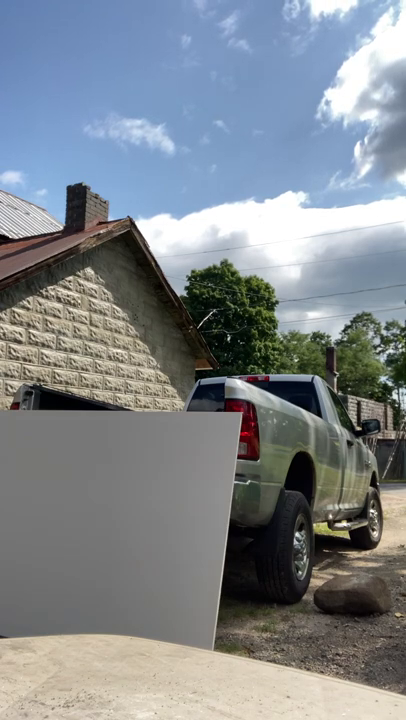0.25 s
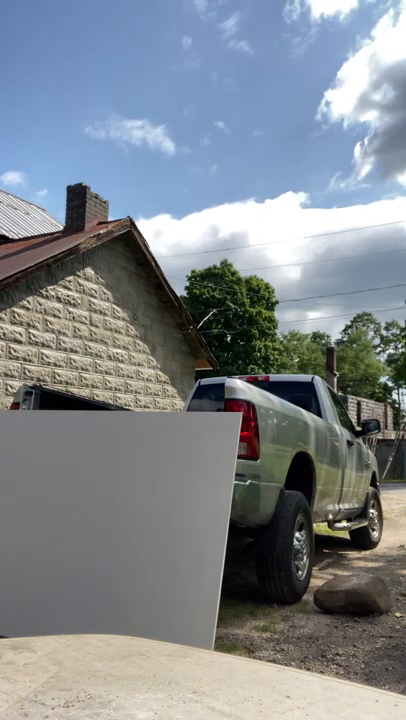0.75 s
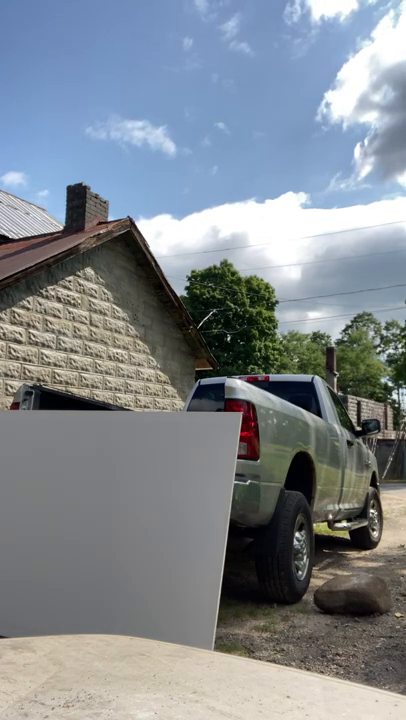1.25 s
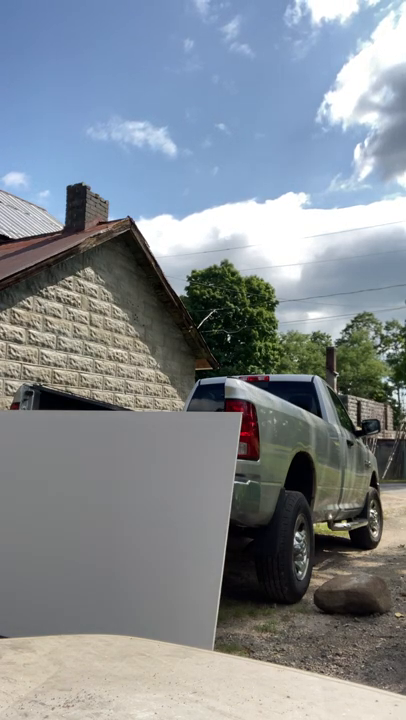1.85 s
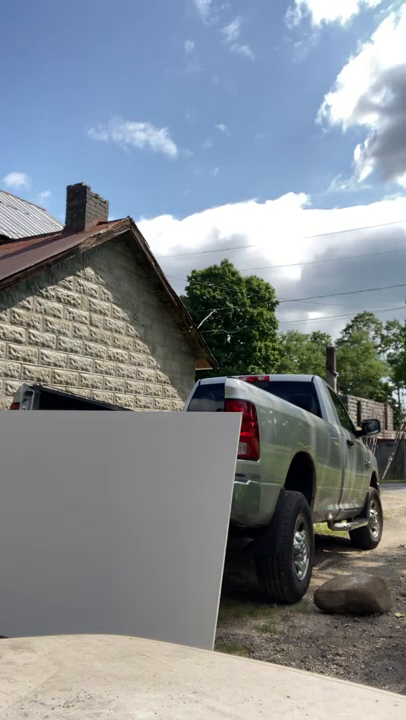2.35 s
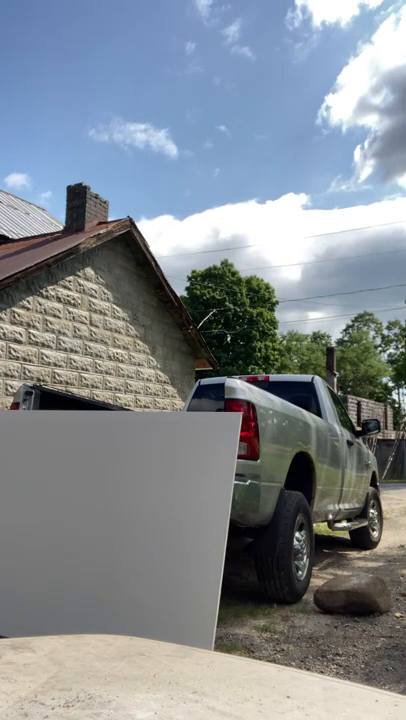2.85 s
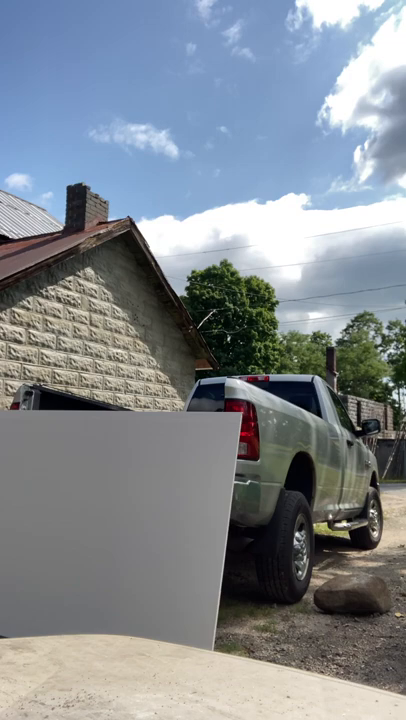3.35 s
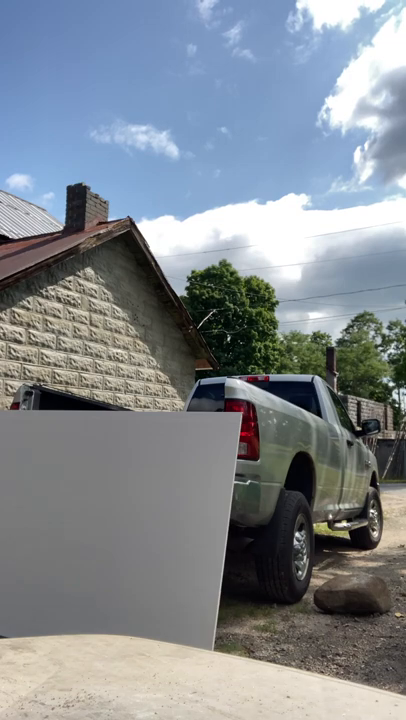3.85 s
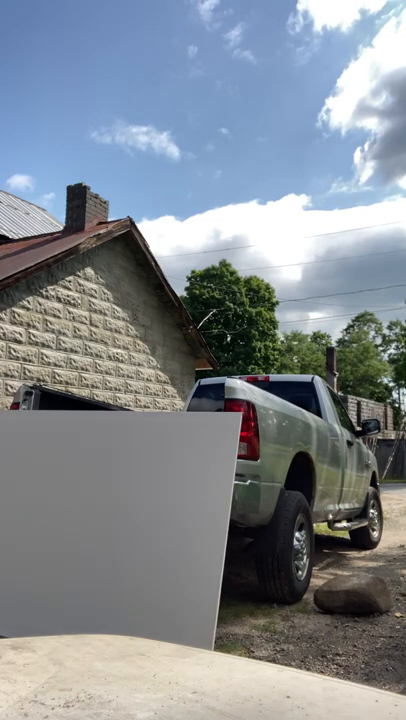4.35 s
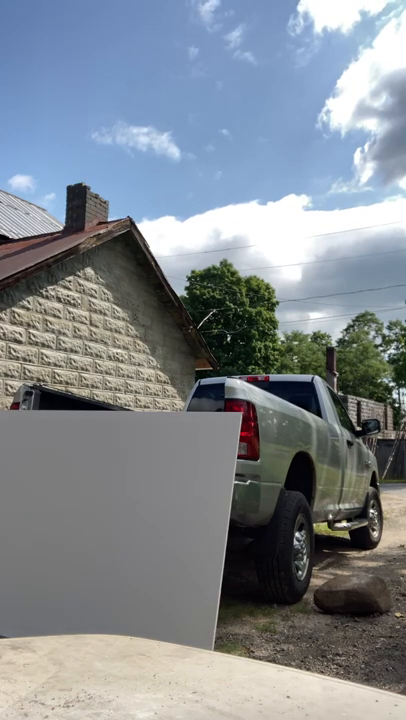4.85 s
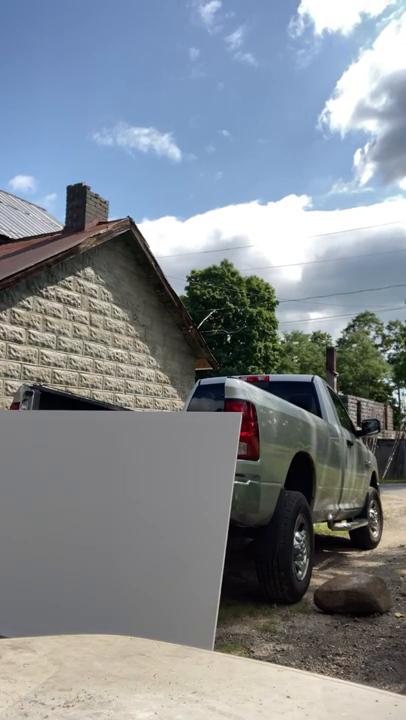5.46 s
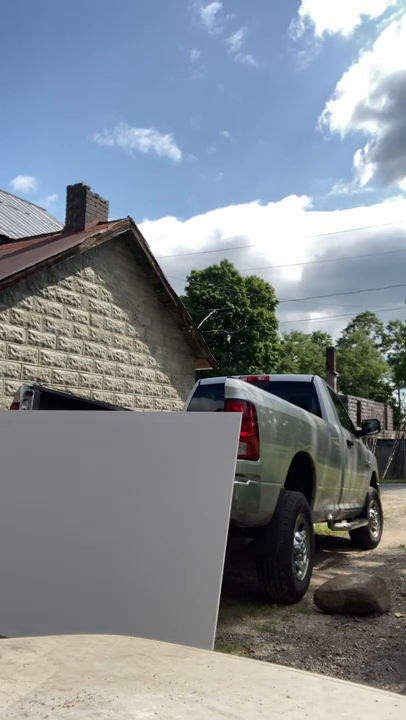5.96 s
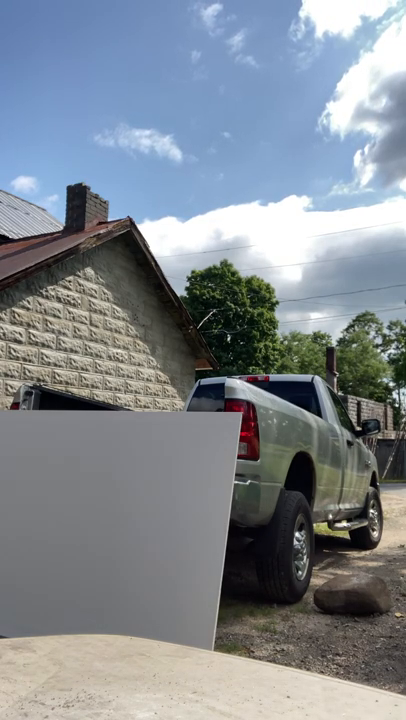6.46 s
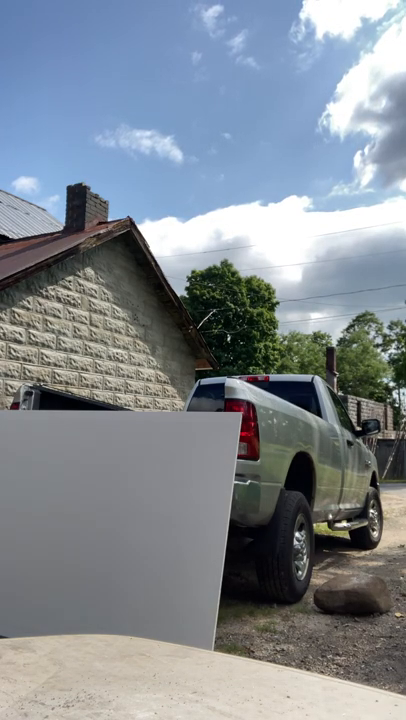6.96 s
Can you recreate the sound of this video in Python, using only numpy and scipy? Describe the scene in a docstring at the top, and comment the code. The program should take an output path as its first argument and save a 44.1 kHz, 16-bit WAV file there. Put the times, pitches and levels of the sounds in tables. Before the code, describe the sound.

Faint insects and distant traffic wash open over a soft low drone. The truck's hum pulses stronger and glides down a little, gaining an uneven growl, wall reflection and road roar in the second half. Brief air hisses puff a few times, and hollow truck-bed knocks tumble midway. Open yard beside a stone building, recorded by two closely spaced microphones with slight wind rumble.

```python
"""A six-cylinder truck engine drones closer beside a yard as it slows: gliding orders of its firing rate.
With it come a wall echo at a shifted rate, tread hums (tones) and road roar (shaped noise).
Leaves and wind are swelling noise; insects are throbbing bands and a cricket's pulsed note.
Air puffs are noise bursts with a whistle; load thuds are decaying modes of the truck bed.
Two microphone ports close together hear it all with differing phase and level."""
import sys
import numpy as np
from scipy import signal
from scipy.io import wavfile
from scipy.ndimage import uniform_filter1d

SR = 44100
rng = np.random.default_rng(int(sys.argv[2]) if len(sys.argv) > 2 else 0)


def to_wav(s):
    """Save 16-bit WAV."""
    ch = np.atleast_2d(s).T  # columns
    pcm = np.round(np.clip(ch, -1, 1) * 32767)  # PCM
    wavfile.write(sys.argv[1], SR, pcm.astype(np.int16))


N = 317520
T = np.arange(N) / SR  # time/s

# Spectra below are relative densities; noise() scales each to rms 1 before its level is applied.

# Firing rate while the truck slows: t/s, direct f/Hz, rise off a wall f/Hz, block f/Hz before its wobble
FIRING_RATE = [(0, 125.5, 0, 124.3), (1.44, 124.4, 0.5, 123.1), (2.4, 119.7, 0, 119.1),
               (3.36, 115.9, 0.5, 116.6), (4.08, 113.7, 1.37, 112.2), (4.8, 111.9, 3, 111.4),
               (5.4, 110.1, 2.5, 110.6), (5.85, 109.2, 3, 110.6), (6.35, 108.9, 3.5, 110.1),
               (6.65, 108.7, 8.5, 109.1), (7.2, 108.9, 5, 110.5)]
# Firing tone swelling and sinking: t/s, level/dB
FIRING_LEVEL = [(0, -59), (.13, -62), (.2, -47.5), (.33, -60), (.65, -45), (.97, -48.5), (1.13, -43),
                (1.5, -40), (1.7, -48), (1.95, -40.5), (2.4, -47), (2.54, -40.5), (2.63, -42.5),
                (2.71, -36.5), (2.82, -41.5), (2.93, -33.5), (3.03, -41), (3.13, -56), (3.24, -34.5),
                (3.28, -42), (3.32, -36), (3.355, -45), (3.38, -34.5), (3.44, -43), (3.52, -36.5),
                (3.62, -48), (3.78, -37), (3.84, -42.5), (4.14, -49.5), (4.4, -37), (4.56, -54), (4.8, -50),
                (4.95, -40), (5.01, -40), (5.07, -39.5), (5.2, -42), (5.29, -44.5), (5.35, -32),
                (5.57, -41), (5.76, -29.5), (6.03, -31.5), (6.2, -33.5), (6.5, -37), (6.96, -34),
                (7.2, -68)]
# Wall echo, before its fade-in: t/s, firing tone level/dB, 3/2 order level/dB
WALL_ECHO = [(3.6, -73, -69), (4.2, -53, -46.5), (4.5, -40.5, -53.5), (4.8, -55.5, -46.5), (5.4, -44, -47),
             (5.65, -65, -41.5), (5.95, -45.5, -68), (6.25, -34, -70), (6.6, -50, -55), (6.9, -44.5, -49),
             (7.2, -35.5, -52)]
# Weak exhaust orders, before their waver: t/s, 3/2 order level/dB, level/dB of each weak multiple
WEAK_ORDERS = [(0, -64, -62, -69), (.8, -80, -69.5, -62.5), (1.3, -70, -60.5, -66.5), (1.9, -74, -60, -65),
               (2.75, -49.5, -63.5, -66), (3.1, -53.5, -59.5, -66), (3.6, -50.5, -65, -68),
               (4.1, -55, -62, -60), (4.4, -64, -79, -63.5), (5.1, -74, -59, -53), (5.9, -56, -72, -62),
               (6.4, -49, -74, -55), (7.2, -67, -72, -55)]
# Weak multiples of the engine cycle (six to the firing rate)
WEAK_CYCLES = [12, 17]
# Growl of the engine block, before offsets, throb and fade-in: t/s, level/dB
GROWL_LEVEL = [(3, -72), (3.2, -64), (3.9, -60), (4.1, -56), (4.4, -52), (4.7, -57.5), (5, -49),
               (5.3, -50.5), (5.55, -51), (5.8, -53.5), (6, -44), (6.17, -49), (6.33, -45), (6.42, -49.5),
               (6.55, -38), (6.7, -45.5), (6.82, -48.5), (6.92, -42), (7.05, -42.5), (7.2, -38.5)]
# Growl multiples of the engine cycle
GROWL_CYCLES = [10, 11, 13, 18, 33]
# Offset of each growl multiple: level/dB
GROWL_OFFSETS = [-18, -13, -23, 0, -32]
# Rasp above the growl, before offsets, throb and fade-in: t/s, level/dB
RASP_LEVEL = [(3.6, -82), (4.3, -60.5), (5, -57.5), (5.7, -61.5), (7.2, -59.5)]
# Rasp multiples of the engine cycle
RASP_CYCLES = [21, 23, 24]
# Offset of each rasp multiple: level/dB
RASP_OFFSETS = [-18, -0.5, -1]
# Block order at 5/2 the firing rate, before throb and fade-in: t/s, level/dB
HALF_ORDER = [(3.5, -65), (4.6, -63.5), (5.3, -57), (5.8, -72), (6.25, -46.5), (6.5, -65), (6.7, -54),
              (6.9, -62), (7.2, -67)]
WAVER_DB, WAVER_HZ = 4, 8  # rms waver of weak orders and tread hums, and its fastest rate
THROB_DB, THROB_HZ = 1.2, 9  # rms throb of the block orders, and its fastest rate
WOBBLE_TURNS, WOBBLE_HZ = .005, 6  # rms phase wobble of the block before smoothing, and its fastest rate
IN_STEP_S = 6.31  # direct sound and echo are in step here

# Tread hums: multiple of the rate off the wall, left-right level/dB, left port lag t/s
TREADS = [(1.218, 1, 0.00041), (.91, -1, 0.00027)]
# Tread hums before their waver: t/s, level/dB of each
TREAD_LEVELS = [(0, -61, -53.5), (.8, -60.5, -77), (1.4, -53, -77), (2.4, -56.5, -59), (3.4, -54, -49),
                (4.4, -52, -47), (5.4, -58.5, -51.5), (6.4, -47.5, -61), (7.2, -57, -61)]
# Road rumble spectrum: f/Hz, density level/dB per Hz
RUMBLE_SPECTRUM = [(40, -33), (70, -0.5), (110, 9.5), (170, 6.5), (240, -6), (320, -13), (900, -92)]
# Deeper rumble of the bumpy stretch: f/Hz, density level/dB per Hz
BUMPY_SPECTRUM = [(40, -30), (70, -8), (100, 3), (135, 8), (200, -9), (400, -43), (900, -90)]
# Road roar spectrum: f/Hz, density level/dB per Hz
ROAR_SPECTRUM = [(150, -20.5), (250, -1.5), (330, 0.5), (420, 0.5), (500, -2), (600, -4.5), (800, -15.5),
                 (3000, -70)]
# Road roar: t/s, level/dB
ROAR_LEVEL = [(0, -63), (1.6, -59), (3.4, -58), (4.2, -55), (5.3, -49.5), (6.7, -48), (7.2, -45)]
# Tyre song: t/s, level/dB, centre f/Hz
TYRE_SONG = [(0, -62, 640), (.55, -58.5, 668), (.9, -59.5, 634), (1.7, -56, 609), (2.2, -58.5, 624),
             (2.5, -55.5, 644), (2.75, -62, 597), (3.15, -62, 598), (3.7, -60.5, 660), (4.4, -55, 677),
             (5, -53, 646), (5.7, -58, 640.7), (6.9, -57.5, 610), (7.2, -47, 590)]
# Far traffic wash spectrum: f/Hz, density level/dB per Hz
WASH_SPECTRUM = [(300, -12), (500, -9.5), (760, 0.5), (880, -3.5), (1070, 1.5), (1300, -5), (1600, -10),
                 (2200, -14.5), (3000, -24), (9000, -60.5)]
# Far traffic wash: t/s, level/dB
WASH_LEVEL = [(0, -58.5), (1.2, -58), (2.5, -58.5), (3, -60), (4.6, -57), (5.3, -57.5), (7.2, -58)]
RUMBLE_START_DB, RUMBLE_RISE_DB_PER_S = -54.5, 1.24
BUMPY_S, BUMPY_SPREAD_S, BUMPY_DB = 3.225, 0.24, -45.5  # peak time, 1/e half-width, peak level
RUMBLE_PATCHY_DB, ROAR_STREAK_DB = 1.2, 3.2  # rms; the roar holds fleeting narrow streaks
SONG_PATCHY_DB, SONG_WIDTH_HZ = 3.8, 50  # rms patchiness; distance from centre to -3.6 dB

# Leaves: f/Hz, density level/dB per Hz before brightening
LEAF_SPECTRUM = [(1200, -11), (2300, -2.5), (3000, 0), (3800, -0.5), (4900, -3), (5600, -8), (7200, -9.5),
                 (9500, -17), (12000, -27), (15500, -39)]
# Breeze in the leaves: t/s, level/dB before a slight drift, brightening/dB (full above 10 kHz)
BREEZE = [(0, -71.5, 3), (1.3, -70.5, -3), (2.6, -66, 2.5), (3.9, -62, 4), (5.3, -64.5, 0),
          (7.2, -63.5, -1.5)]
# Wind on the microphone: t/s, level/dB
WIND_LEVEL = [(0, -62), (2.4, -57.5), (3.39, -52), (4.1, -56), (4.6, -59), (5.5, -57.5), (6.2, -56),
              (6.8, -57), (7.2, -57.5)]
# Wind spectrum: f/Hz, density level/dB per Hz
WIND_SPECTRUM = [(12, -33), (30, -22), (45, 1.5), (65, 8), (90, -4), (130, -10), (400, -85)]
# Steady microphone hiss spectrum: f/Hz, density level/dB per Hz
HISS_SPECTRUM = [(5000, -33), (11000, -4), (13000, -1.5), (15500, -4)]
HISS_DB, WIND_LUMPS_DB = -85, 2.2  # hiss level; rms lumpiness of the wind

# Insect choir spectrum: f/Hz, density level/dB per Hz
CHOIR_SPECTRUM = [(6500, -50.5), (7500, -13.5), (8070, -3), (8400, 0.5), (8490, 1), (8580, -1.5),
                  (8910, -6), (9150, -22), (11000, -80.5)]
# Swells of the higher cricket, before HIGH_DB: middle t/s, level/dB
SWELLS = [(.05, -74), (.31, -79), (.52, -72), (.62, -70), (.75, -78), (1.0, -80), (1.21, -78), (1.31, -77),
          (1.47, -75), (1.6, -82), (1.88, -79), (2.16, -79), (2.42, -76), (2.68, -78), (2.76, -84)]
# Near cricket's chirps, before the pulse envelope: t/s, level/dB
CHIRPS = [(0.0308, -66), (0.3711, -65), (0.7093, -66.5), (1.0823, -66), (1.4823, -65), (1.8495, -72),
          (2.1696, -68), (2.5894, -62), (3.4994, -67), (3.941, -62), (4.288, -63), (4.4787, -63),
          (4.8639, -62), (5.448, -60.5), (5.895, -61), (6.3655, -67), (6.77, -65), (6.82, -66),
          (6.891, -67)]
CHOIR_DB, CHOIR_PER_S = -65, 16  # level before throb; mean throbs per second
SWELL_S, BETWEEN_DB, QUIET_S = .045, -83, 2.75  # 1/e half-width; floor before HIGH_DB; floor starts fading
HIGH_HZ, HIGH_WANDER_HZ, HIGH_WIDTH_HZ, HIGH_DB = 4870, 65, 100, -0.5  # mean, rms, half-power, offset
FAR_HZ, FAR_WIDTH_HZ, FAR_DB = 5420, 210, -84.5  # far cricket: centre, half-power distance, mean dB
CHIRP_RING_S = .012  # 1/e decay of a pulse

# Air puffs: middle t/s, level/dB, time scale t/s (over 3.5 rising, 2.2 falling), tilt/dB per octave,
# whistle f/Hz, whistle level/dB, left-right level/dB, body/dB at 1.7 kHz, top/dB at 14.6 kHz
PUFFS = [(0.408, -58.5, 0.12, 5.5, 2084, -45.5, 3, 10, 10),
         (2.313, -55, 0.082, 4, 3480, -43, 0.5, -6.5, -1), (2.568, -60, 0.065, 5, 2900, -53, 1, -3, -4),
         (4.848, -60.5, 0.15, 5, 4000, -66, 1, -5, 8)]
# Puff spectrum before tilt, body and top: f/Hz, density level/dB per Hz
PUFF_SPECTRUM = [(700, -13), (1500, 17), (3500, 9.5), (6000, 0), (10000, -8.5), (13000, -26), (15500, -32)]
PUFF_GRAIN_DB = 4.8  # rms

# Thuds of the load: t/s, knock level/dB, boom level/dB, tilt/dB per octave about 250 Hz
THUDS = [(2.495, -50, -32, -8), (3.149, -39.5, -48, -3), (3.225, -48.5, -47, -8), (3.315, -45, -45, -4),
         (3.37, -49.5, -42, -8.5), (3.421, -49, -56, 3.5), (3.945, -40.5, -48, -0.2), (4.001, -49, -42, -4)]
# Modes of the truck bed: f/Hz, level/dB before tilt, 60 dB decay t/s
BED_MODES = [(87, -3, 0.67), (128, -1, 0.28), (192.6, 1, 0.22), (272, 0, 0.17), (318.5, -0.5, 0.27),
             (366.4, 3.5, 0.15), (443, -0.5, 0.17), (526, -3, 0.088), (700, -13, .06)]

# Likeness of the two ports for noise: f/Hz, coherence from 0 to 1
PORT_LIKENESS = [(35, 0.054), (55, 0.26), (80, 0.7), (110, 0.95), (300, 0.96), (600, 0.44), (800, 0.46),
                 (1200, 0.37), (3000, 0.12), (6500, 0.82)]
# Phase of the shared noise: f/Hz, radians the left port leads
PORT_LEAD = [(100, 0.5), (430, -0.5), (660, 1.12), (860, 3.5), (2330, 3), (4050, 5.5), (5080, 3.5),
             (6800, 5.5)]
# Level balance of the ports for noise: f/Hz, left-right level/dB
PORT_BALANCE = [(30, -7), (100, 3), (270, 3), (700, 1), (1650, 0), (3500, -0.8), (6000, 0.2)]
MONO_HZ, EDGE_HZ = 6950, 15150  # mono above the first, band limit at the second


def gain_of(db):
    """Level definition: 20 dB is a tenfold amplitude."""
    return 10 ** (np.asarray(db) / 20)


def evened(x):
    """Root-mean-square normalization."""
    return x / np.sqrt(np.mean(x ** 2) + 1e-20)


def read(points, hz):
    """Spectral interpolation along logarithmic frequency."""
    f, value = np.transpose(points)
    return np.interp(np.log(hz + 1), np.log(f + 1), value)


def columns(rows):
    """Linear interpolation of each time-varying column."""
    s, *values = np.transpose(rows)
    return [np.interp(T, s, v) for v in values]


def fade_in(s):
    """Linear amplitude ramp lasting 0.19 s."""
    return np.clip((T - s) / 0.19, 0, 1)


def drift(top_hz):
    """Superposition of slow sines of random phase, giving fluctuation of rms 1."""
    rates_hz = np.geomspace(top_hz / 10, top_hz, 20)
    slow = sum(np.sin(2 * np.pi * (f * T[::64] + rng.random())) for f in rates_hz)
    return evened(slow).repeat(64)[:N]


def noise(spectrum, patchy_db, size=1024, count=(8, 10)):
    """Partial coherence: patchy noise shared between two ports with phase and level differences.

    spectrum is (Hz, dB) points or a rule of (Hz, s); count smooths patches over (frames, bins)."""
    hop = size // 4
    frames = N // hop + 5
    hz = np.fft.rfftfreq(size, 1 / SR)
    a, b, c, d, patches = rng.standard_normal((frames, len(hz), 5)).T
    patches = uniform_filter1d(patches, size=count[1], axis=0)
    patches = evened(uniform_filter1d(patches, size=count[0], axis=1))
    if callable(spectrum):
        shape_db = spectrum(hz[:, None], np.arange(frames) * hop / SR)
    else:
        shape_db = read(spectrum, hz)[:, None]
    likeness = np.clip(read(PORT_LIKENESS, hz), 0, 1)[:, None]
    left = a + 1j * b
    shared = left * np.exp(-1j * read(PORT_LEAD, hz))[:, None]
    right = likeness * shared + np.sqrt(1 - likeness ** 2) * (c + 1j * d)
    balance = gain_of(read(PORT_BALANCE, hz)[:, None] / 2)
    bins = np.array([left * balance, right / balance]) * gain_of(shape_db + patchy_db * patches)
    x = signal.istft(bins, nperseg=size, noverlap=size - hop)[1][:, :N]
    return x / np.sqrt(np.mean(x.mean(0) ** 2))  # rms 1 in the mean of the ports


def tones(hz, multiples, levels_db, pan_db, lag_s, start_turns=0):
    """Phase integration: orders of one gliding rate, reaching the left port lag_s later."""
    turns = start_turns + np.cumsum(hz) / SR
    turns = np.array([turns - hz * lag_s / 2, turns + hz * lag_s / 2])
    x = sum(gain_of(db) * np.cos(2 * np.pi * k * turns) for k, db in zip(multiples, levels_db))
    return np.sqrt(2) * x * gain_of([[pan_db / 2], [-pan_db / 2]])  # levels are rms


def block_levels(rows, offsets_db):
    """Amplitude modulation: each block order throbs independently about its level."""
    level_db = columns(rows)[0]
    return [level_db + db + THROB_DB * drift(THROB_HZ) for db in offsets_db]


def engine():
    """Engine orders: six firings a cycle, uneven-cylinder orders, and a frequency-shifted echo."""
    direct_hz, shift_hz, block_hz = columns(FIRING_RATE)
    wobble = uniform_filter1d(drift(WOBBLE_HZ), size=256)
    block_hz = block_hz + WOBBLE_TURNS * SR * np.gradient(wobble)
    half_db, *upper_db = [db + WAVER_DB * drift(WAVER_HZ) for db in columns(WEAK_ORDERS)]
    pipe = tones(direct_hz, [1, 3 / 2], columns(FIRING_LEVEL) + [half_db], pan_db=0.4, lag_s=0.00031)
    pipe += tones(block_hz, np.array(WEAK_CYCLES) / 6, upper_db, pan_db=1.0, lag_s=0.00044)
    echo = tones(direct_hz + shift_hz, [1, 3 / 2], columns(WALL_ECHO), pan_db=0.0, lag_s=0.0007,
                 start_turns=-shift_hz[T < IN_STEP_S].sum() / SR)
    growl_db = block_levels(GROWL_LEVEL, GROWL_OFFSETS)
    rasp_db = block_levels(RASP_LEVEL, RASP_OFFSETS)
    growl = tones(block_hz, np.array(GROWL_CYCLES) / 6, growl_db, pan_db=2.0, lag_s=.0001)
    growl += tones(block_hz, np.array(RASP_CYCLES) / 6, rasp_db, pan_db=-0.5, lag_s=0.00014)
    growl += tones(block_hz, [5 / 2], block_levels(HALF_ORDER, [0]), pan_db=5.0, lag_s=.0001)
    return pipe + fade_in(WALL_ECHO[0][0]) * echo + fade_in(GROWL_LEVEL[0][0]) * growl


def tread_hums():
    """Periodic excitation: two tread tones keep fixed ratios to the rate off the wall."""
    direct_hz, shift_hz, _ = columns(FIRING_RATE)
    hums = np.zeros((2, N))
    for (k, pan_db, lag_s), db in zip(TREADS, columns(TREAD_LEVELS)):
        hums += tones(direct_hz + shift_hz, [k], [db + WAVER_DB * drift(WAVER_HZ)], pan_db, lag_s)
    return hums


def tyre_song():
    """Band-limited noise: a narrow resonance slides in frequency."""
    s, _, centre_hz = np.transpose(TYRE_SONG)

    def band(hz, t):
        distance = (hz - np.interp(t, s, centre_hz)) / SONG_WIDTH_HZ
        return -12 * np.log10(1 + distance ** 4)

    return gain_of(columns(TYRE_SONG)[0]) * noise(band, SONG_PATCHY_DB, size=4096, count=(5, 1))


def road():
    """Incoherent addition: tread hums and tyre song join broadband rumble, roar and far wash."""
    rumble_gain = gain_of(RUMBLE_START_DB + RUMBLE_RISE_DB_PER_S * T)
    rumble = rumble_gain * noise(RUMBLE_SPECTRUM, RUMBLE_PATCHY_DB, size=4096, count=(8, 1))
    bumpy_gain = gain_of(BUMPY_DB) * np.exp(-((T - BUMPY_S) / BUMPY_SPREAD_S) ** 2)
    bumpy = bumpy_gain * noise(BUMPY_SPECTRUM, 1.2, size=2048, count=(4, 2))
    roar_gain = gain_of(columns(ROAR_LEVEL)[0])
    roar = roar_gain * noise(ROAR_SPECTRUM, ROAR_STREAK_DB, size=4096, count=(12, 1))
    wash = gain_of(columns(WASH_LEVEL)[0]) * noise(WASH_SPECTRUM, 3.9, count=(5, 2))
    return tread_hums() + rumble + bumpy + roar + tyre_song() + wash


def air():
    """Turbulent noise: leaves change in brightness, wind is lumpy on the ports, microphone hiss is steady."""
    s, _, bright_db = np.transpose(BREEZE)

    def leaf_shape(hz, t):
        return read(LEAF_SPECTRUM, hz) + np.interp(t, s, bright_db) * np.clip(hz / 5000 - 1, 0, 1)

    leaves = gain_of(columns(BREEZE)[0] + 0.34 * drift(8)) * noise(leaf_shape, 3.3, count=(5, 2))
    wind = gain_of(columns(WIND_LEVEL)[0]) * noise(WIND_SPECTRUM, WIND_LUMPS_DB, size=4096)
    hiss = gain_of(HISS_DB) * noise(HISS_SPECTRUM, 2.4, count=(5, 2))
    return leaves + wind + hiss


def cricket_note(centre_hz, width_hz):
    """Resonance: a band around a given centre, at half power width_hz away."""
    def band(hz, t):
        return -10 * np.log10(1 + ((hz - np.interp(t, T, centre_hz)) / width_hz) ** 4)
    return band


def choir():
    """Amplitude modulation: a patchy band of many insects throbs at a wandering rate."""
    throb_hz = CHOIR_PER_S * (1 + 0.038 * drift(5.6))
    throb_db = 0.37 * np.sin(2 * np.pi * np.cumsum(throb_hz) / SR)
    return gain_of(CHOIR_DB + throb_db) * noise(CHOIR_SPECTRUM, 2.8, size=2048, count=(3, 1))


def distant_crickets():
    """Narrow-band noise: one wandering note in Gaussian swells, and one fluctuating far note."""
    high_hz = HIGH_HZ + HIGH_WANDER_HZ * drift(5)
    high = gain_of(HIGH_DB) * noise(cricket_note(high_hz, HIGH_WIDTH_HZ), 4.3, count=(5, 3))
    swells = sum(gain_of(db) * np.exp(-((T - s) / SWELL_S) ** 2) for s, db in SWELLS)
    floor = gain_of(BETWEEN_DB) * (1 - fade_in(QUIET_S))
    far_note = cricket_note(np.full(N, FAR_HZ), FAR_WIDTH_HZ)
    far = gain_of(FAR_DB + 3.9 * drift(4)) * noise(far_note, 3.4, count=(6, 3))
    return (swells + floor) * high + far


def near_cricket():
    """Stridulation: three wing scrapes pulse a note, each smoothed by a decaying ring."""
    out = np.zeros((2, N))
    # a noisy band around 4.6 kHz with a steady sine in it
    wing = noise([(4200, -58), (4560, -7), (4640, -1), (4720, -23), (5100, -65)], .8)
    wing = wing + .5 * np.sin(2 * np.pi * (4640 * T + [[0], [-.35]]))
    ring = np.exp(-1 / (CHIRP_RING_S * SR))
    for s, db in CHIRPS:
        u = (T - s) / 0.02 + 0.95  # pulse periods since the start
        scrape = np.sin(np.pi * (u % 1)) ** 2 * (u >= 0) * (u < 3)
        scrape = signal.lfilter([1 - ring], [1, -ring], scrape)
        out += gain_of(db) * scrape * wing
    return out


def insects():
    """Superposition of the insect choir and the crickets."""
    return choir() + distant_crickets() + near_cricket()


def puffs():
    """Jet noise: escaping air gives grainy bursts, each with a short whistle."""
    out = np.zeros((2, N))

    def bump(f, hz, db):
        return db * np.exp(-(np.log2((f + 1) / hz) / 0.54) ** 2)

    for s, db, length, tilt_db, hz, whistle_db, pan_db, body_db, top_db in PUFFS:
        def shape(f, t):
            tilted = read(PUFF_SPECTRUM, f) + tilt_db * np.log2((f + 1) / 4000)
            return tilted + bump(f, 1700, body_db) + bump(f, 14600, top_db)

        hiss = noise(shape, PUFF_GRAIN_DB, size=512, count=(3, 3))
        lean = (T - s) / length * np.where(T < s, 3.5, 2.2)  # rises faster than it dies
        whistle = np.sin(2 * np.pi * (hz * T + [[0], [-.4]]))
        whistle = np.exp(-((T - s - .011) / 0.012) ** 2) * whistle
        puff = gain_of(db) * np.exp(-lean ** 2) * hiss + gain_of(whistle_db) * whistle
        out += puff * gain_of([[pan_db / 2], [-pan_db / 2]])
    return out


def thuds():
    """Modal decay: a bump excites bed modes, each randomly delayed, and a low boom."""
    t = np.arange(SR // 2) / SR
    out = np.zeros((2, N))
    boom = gain_of(-60 * t / 0.46) * np.sin(2 * np.pi * 60 * t) * (1 - np.exp(-t / 0.018))
    for s, db, boom_db, tilt_db in THUDS:
        knock = np.zeros((2, len(t)))
        for (hz, mode_db, t60), (late, turn, skew) in zip(BED_MODES, rng.random((len(BED_MODES), 3))):
            u = np.clip(t - 0.01395 * late, 0, None)  # time since this mode began
            decay = gain_of(mode_db + tilt_db * np.log2(hz / 250) - 60 * u / t60)
            swing = decay * (1 - np.exp(-u / 0.003))
            port_turns = np.array([[0], [0.43 * (skew - .5)]])
            knock += swing * np.sin(2 * np.pi * (hz * u + turn + port_turns))
        at = round(s * SR)
        out[:, at:at + len(t)] += gain_of(db) * gain_of([[1.5], [-1.5]]) * knock + gain_of(boom_db) * boom
    return out


def scene():
    """Linear superposition of all sources."""
    return engine() + road() + air() + insects() + puffs() + thuds()


def low_pass(x, hz):
    """Linear-phase filtering by a finite impulse response."""
    taps = signal.firwin(511, hz, window=("kaiser", 9), fs=SR)
    padded = np.pad(x, 255, "reflect", reflect_type="odd")
    return signal.oaconvolve(padded, taps, "valid")


def record(dry):
    """Mid-side filtering: mono treble and a band limit, then 4 ms ramps at the ends."""
    mid = low_pass(dry.mean(0), EDGE_HZ)
    side = low_pass((dry[0] - dry[1]) / 2, MONO_HZ)
    fade = np.clip(np.minimum(T, T[::-1]) / .004, 0, 1)
    return np.array([mid + side, mid - side]) * fade


dry = scene()
out = record(dry)
to_wav(out)
```